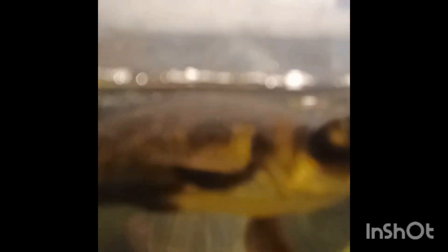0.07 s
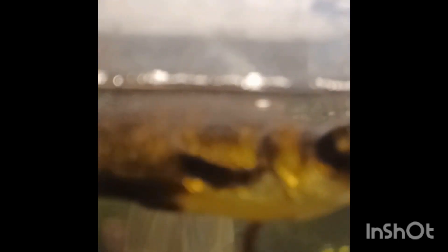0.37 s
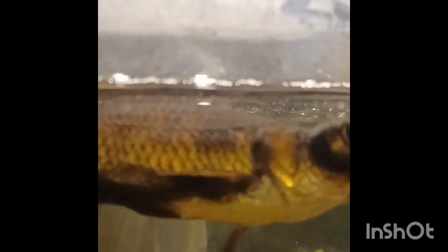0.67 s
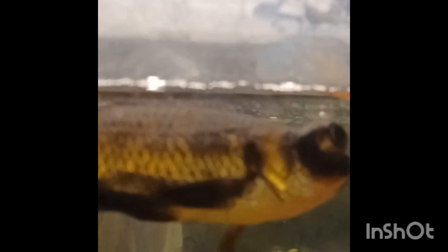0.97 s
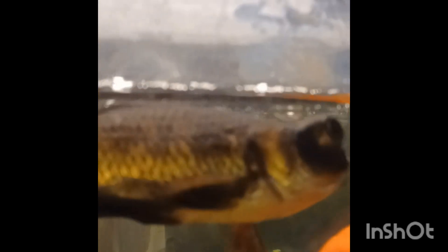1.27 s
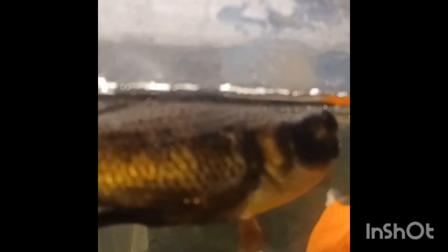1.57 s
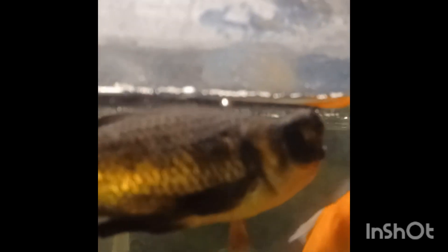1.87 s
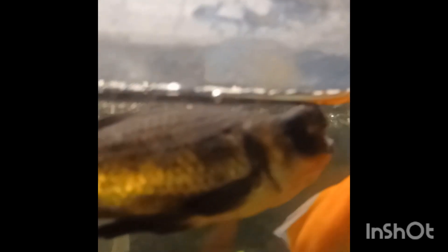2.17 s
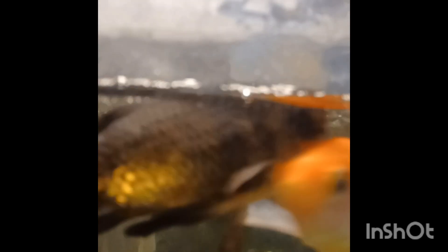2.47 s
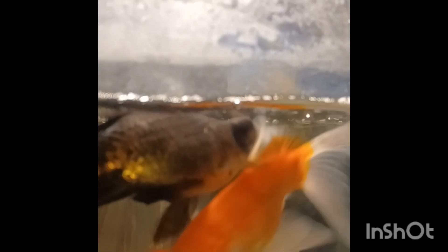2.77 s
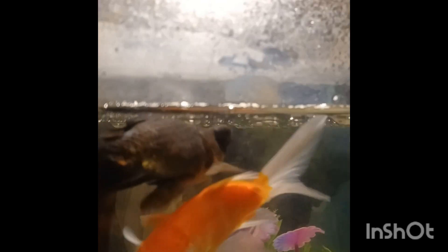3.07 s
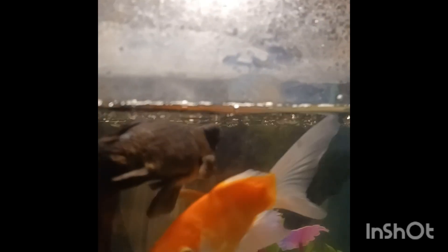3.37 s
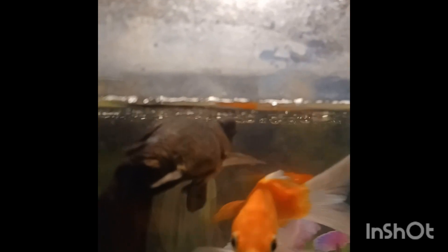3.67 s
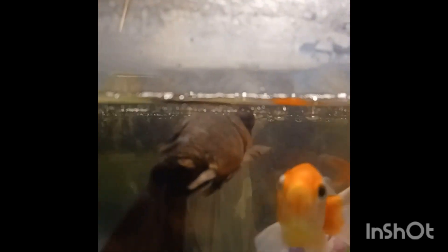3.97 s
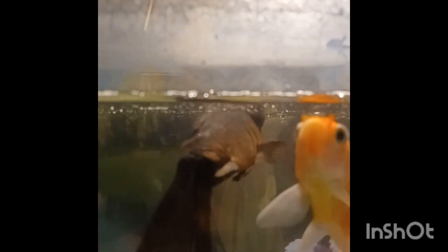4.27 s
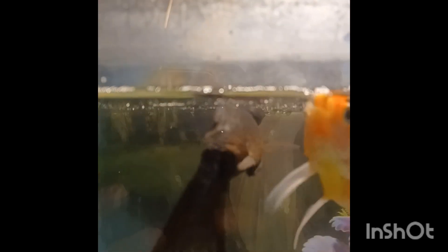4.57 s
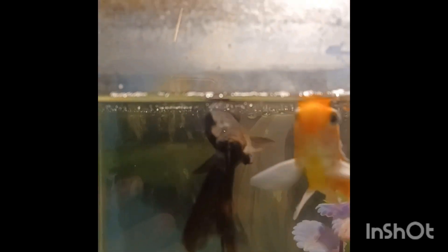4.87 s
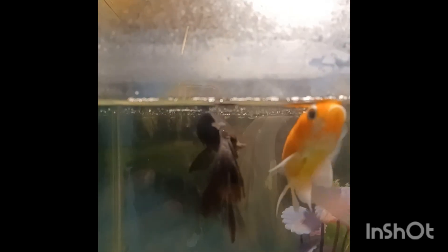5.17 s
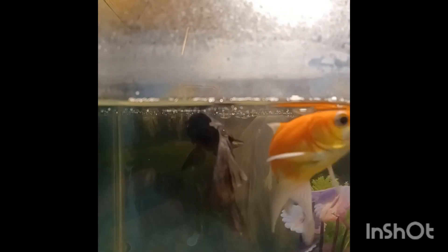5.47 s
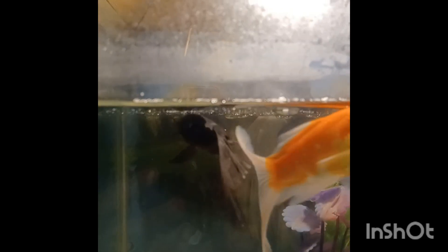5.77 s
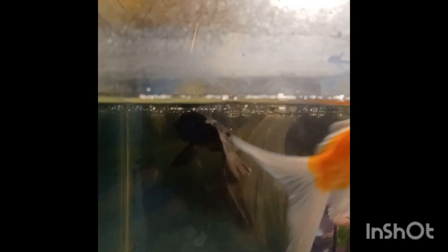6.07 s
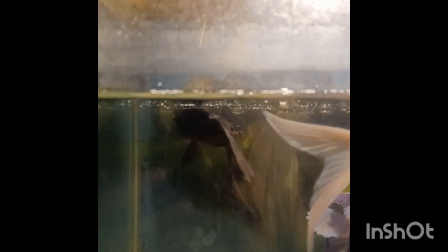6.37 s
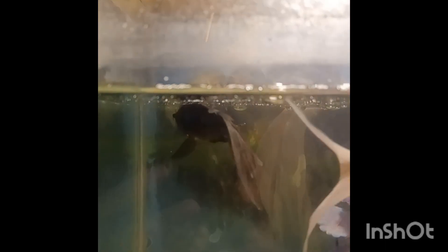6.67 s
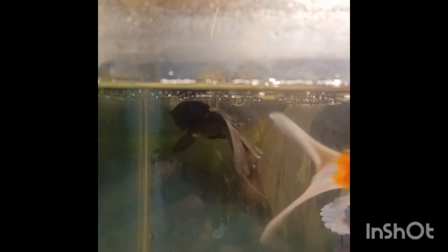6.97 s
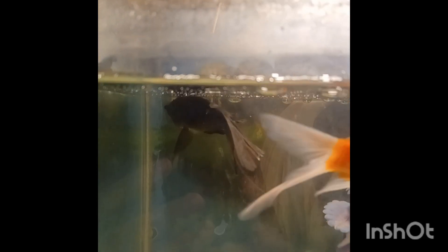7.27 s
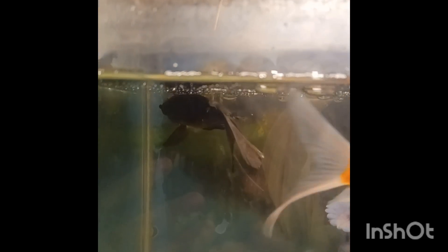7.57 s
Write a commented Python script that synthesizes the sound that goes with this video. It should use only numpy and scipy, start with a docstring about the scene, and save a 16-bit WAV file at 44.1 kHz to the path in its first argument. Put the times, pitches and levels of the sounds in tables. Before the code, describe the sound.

From start to end, about seven and a half seconds, an aquarium air pump hums steadily at close range, with a thin buzz and a faint hiss of air. Bubbles gurgle continuously through the water of the small tank and burst in a fine, high fizz at the surface, a little to the right. Tiny bright droplet ticks are scattered throughout, thickest between 1.5 and 3 seconds. At about 2.1 seconds one short splash ends in a plop. A soft, dull bump comes near 4.9 seconds, with much fainter ones around 2.5 and 7.4. Slightly larger gulps of air rise near 1.4, 4.6, 5.5 and 6.4 seconds, and the water splutters lightly around 5.7. Behind it all lie a low indoor rumble and the drone of a slow fan. The overall sound is quiet and even.

```python
"""Small fish tank, close up

A mains-driven diaphragm air pump knocks once a cycle: a steady hum with a thin buzz and a hiss of air.
The air gurgles up through the water and fizzes at the surface; droplets tick, the water splutters,
and one short splash ends in a plop. Behind it sit a low room rumble, a slow fan and a few soft bumps."""
import sys
import numpy as np
from scipy import signal
from scipy.fft import rfft, irfft, next_fast_len
from scipy.io import wavfile
from scipy.ndimage import map_coordinates

SR = 44100
rng = np.random.default_rng(int(sys.argv[2]) if len(sys.argv) > 2 else 0)


def dump_mix(stems):
    """Bounce the given channels to the path in sys.argv[1] as a 16-bit WAV at rate SR."""
    frames = np.atleast_2d(stems).T  # one column per channel
    limited = np.clip(frames, -1, 1)  # hard clip at full scale
    pcm = np.round(limited * 32767).astype(np.int16)
    wavfile.write(sys.argv[1], SR, pcm)


N = 340804
MAINS_HZ, FIRST_STROKE_S = 50.222, .0205

# The pump's hum. Each row: multiple of the mains frequency, left and right level in dB.
PUMP_HUM = [(1, -74.5, -73.0), (2, -54.5, -59.0), (3, -46.5, -46.0), (4, -47.5, -47.5), (5, -45.0, -46.0),
            (6, -38.0, -38.5), (7, -45.0, -56.0), (8, -42.0, -44.0), (9, -59.5, -51.0), (10, -78.5, -61.0),
            (11, -57.5, -52.5), (12, -50.0, -47.5), (13, -53.5, -55.5)]
# The buzz of its case and valves. Each row: frequency in Hz, left and right base level in dB.
PUMP_BUZZ = [(753, -65.0, -60.0), (954, -64.5, -62.0), (1055, -74.5, -68.0), (1155, -75.0, -60.0),
             (1356, -80.5, -69.0), (1507, -83.5, -82.5), (1657, -84.0, -72.5), (1808, -82.0, -76.0),
             (2009, -73.5, -73.0), (2260, -76.0, -72.5), (2360, -71.5, -63.5), (2511, -80.5, -70.0),
             (2712, -96.0, -97.5), (3415, -91.5, -97.5)]
# Fader moves on the two buzzing resonances. Each row: time in seconds, case and valve gain in dB.
BUZZ_FADERS = [(0, -0.5, 3.5), (1.5, -2, 3.5), (2.1, -1.5, 2.5), (2.4, -4, 0.5), (4.3, -4, -0.3),
               (5.7, -2.5, -0.5), (6.4, -1, -0.2), (7.5, 1, -1)]
# The hiss of pumped air. Each row: frequency in Hz, left and right base level in dB per Hz.
HISS_SPECTRUM = [(895, -120, -115), (1370, -99.5, -91.5), (1540, -99, -89.5), (1850, -92.5, -91),
                 (2490, -99, -94), (2670, -105, -106), (3600, -109, -107), (3770, -114, -111),
                 (4410, -114, -111), (5730, -125, -128)]
# Bubbles, coloured by the air under the lid. Each row: frequency in Hz, left and right base dB per Hz.
GURGLE_SPECTRUM = [(352.05, -105, -105), (476, -92, -92.5), (564, -94.5, -77.5), (691, -84, -80),
                   (723.3, -67.5, -65), (816, -71.5, -67), (869, -82, -72), (1003, -78, -71.5),
                   (1033, -93.5, -79.5), (1307, -85, -79), (1560, -100, -93), (2300, -120, -118)]
# Larger gulps of air. Each row: time in seconds, boost in dB.
AIR_GULPS = [(.85, 3), (1.35, 4), (4.58, 4), (5.49, 6), (6.42, 4.5), (7.02, 2.5)]
# Tiny bubbles bursting. Each row: frequency in Hz, left and right base level in dB per Hz.
FIZZ_SPECTRUM = [(3000, -125, -125), (6000, -112, -119), (6400, -107.5, -111), (8400, -114.5, -105.3),
                 (9500, -115.5, -106), (10360, -118.5, -102), (12300, -116.5, -101.5),
                 (14000, -114.5, -107), (15600, -113.5, -108.5)]
# Droplet ticks. Each row: start in seconds, relative level in dB, pitch in Hz, left over right in dB.
DROPLETS = [(0.431, -45.5, 11000, -18), (0.7802, -48, 12100, -16), (0.858, -45, 11800, -22),
            (1.4891, -45, 11600, -14), (1.7585, -52.5, 11900, -13), (1.8233, -52.5, 11500, -13),
            (1.8517, -63, 5500, 2), (2.0456, -49, 11800, -13), (2.0708, -45.5, 11100, -26),
            (2.214, -46, 8000, -18), (2.2284, -46, 12700, -13), (2.2628, -47.5, 13300, -10),
            (2.5098, -53, 7768, -17), (2.5307, -47, 11260, -12.5), (2.5651, -50, 9856, -14),
            (2.7208, -45, 12600, -21), (2.762, -50, 10600, -18), (3.4126, -48.5, 10100, -15),
            (3.6172, -51.5, 11900, -11), (3.719, -55, 6750, -4), (3.7994, -52, 10900, -17),
            (4.295, -60, 6800, 0), (4.9696, -50.5, 14900, -6), (5.149, -58, 6200, 0), (6.07, -59, 5900, -1),
            (6.478, -56.5, 6700, -1.5), (7.002, -52.5, 9860, -6), (7.363, -54, 13700, -15.5),
            (7.4286, -52, 11400, -9)]
# Splashes and splutters. Each row: start and length in seconds, level in dB, growth over the length
# in dB, left over right in dB, treble tilt in dB per octave.
SPURTS = [(.45, .02, -66, 0, 0, -1), (1.02, .015, -66.5, 0, 1, -3), (1.345, .008, -63, -3, -3, -3),
          (2.046, .002, -54, 0, 0, -2), (2.103, .048, -48, 6, -1, 3.5), (2.128, .012, -44, 3, 7, -5),
          (2.139, .012, -36.5, 0, 13, -4.5), (2.155, .09, -60, -5, 0, -5), (2.212, .007, -50, 2, -5, -5),
          (4.65, .06, -67, 0, 0, -10), (4.92, .02, -58, -4, 0, -11), (5.17, .05, -68, 0, 1, -3),
          (5.712, .006, -59, 0, 2, -4), (5.733, .004, -54, 0, 2, -4), (5.775, .025, -60, -2, 1, -4),
          (6.324, .025, -68, -2, 2, -2)]
# The tone of their spray. Each row: frequency in Hz, relative level in dB.
SPRAY_SPECTRUM = [(300, -31), (900, 13), (1800, -8.5), (3500, -1.5), (5500, -6.5), (9000, -9.5),
                  (13500, -5.5), (16000, -5.5)]
# Room rumble. Each row: frequency in Hz, left and right level in dB per Hz.
RUMBLE_SPECTRUM = [(20, -102, -102), (42, -95.5, -102), (57.6, -91.5, -99.5), (79, -79.5, -76.5),
                   (118, -76.5, -78.5), (162, -73, -75), (217.87, -81.5, -74.5), (292, -86, -71.5),
                   (406, -80, -82), (520, -103, -102.5), (895, -115, -115)]
# Overtones of the fan's blade rate. Each row: frequency in Hz, level in dB.
FAN_TONES = [(71.1, -69), (94.8, -66), (106.6, -61.5), (118.5, -55.5), (142.2, -61), (165.9, -64),
             (177.7, -58), (189.6, -76), (213.3, -63.5)]
# Soft bumps. Each row: start in seconds, relative level in dB, time to fall 60 dB in seconds.
SOFT_BUMPS = [(2.549, -43, 0.16), (4.914, -26, 0.13), (5.019, -45, 0.29), (7.361, -46, 0.24)]
# The tone of a bump. Each row: frequency in Hz, relative level in dB.
BUMP_SPECTRUM = [(30, -29), (90, 2), (200, -17), (300, 13), (420, -23), (1500, -17), (4000, -67)]


def amp(db):
    """Decibels to gain."""
    return 10 ** (np.asarray(db) / 20)


def unit(x):
    """Scale to rms 1."""
    return x / np.sqrt(np.mean(x ** 2) + 1e-20)


def bell(x, width):
    """A bell curve of height 1 around zero."""
    return np.exp(-.5 * (x / width) ** 2)


def along(points, hz):
    """Read each level column of a spectrum on a log frequency axis."""
    f, *cols = np.transpose(points)
    return np.array([np.interp(np.log(hz + 1), np.log(f + 1), c) for c in cols])


def wobble(rate, size=N):
    """A smooth random curve, rate knots a second."""
    knots = rng.standard_normal(int(size * rate / SR) + 4)
    fine = np.arange(8 * len(knots)) / 8
    return np.interp(np.arange(size) * rate / SR, fine, map_coordinates(knots, [fine], mode='nearest'))


def filtered(x, response):
    """EQ x with a function of frequency."""
    m = next_fast_len(x.shape[-1] + 8192)
    return irfft(rfft(x, m) * response(np.fft.rfftfreq(m, 1 / SR)), m)[..., :x.shape[-1]]


def coloured(white, spectrum):
    """Give white noise of rms 1 a spectrum in dB per Hz, rolling off above its last point."""
    cutoff_hz = 1.5 * spectrum[-1][0]
    response = lambda hz: amp(along(spectrum, hz)) * np.sqrt(SR / 2) / (1 + (hz / cutoff_hz) ** 8)
    return filtered(white, response)


def shaped_noise(colour, size, channels=2):
    """Noise through an EQ curve, at rms 1."""
    return unit(filtered(rng.standard_normal((channels, size)), colour))


def stereo_noise(shared):
    """White noise with a share of its power common to both sides."""
    return np.sqrt(shared) * rng.standard_normal(N) + np.sqrt(1 - shared) * rng.standard_normal((2, N))


def panned(db):
    """Left and right gains for a level difference."""
    gains = amp([[db / 2], [-db / 2]])
    return gains / np.sqrt(np.mean(gains ** 2))


def add(out, s, sound):
    """Mix a sound in at s seconds."""
    part = out[:, round(s * SR):][:, :sound.shape[-1]]
    part += sound[..., :part.shape[-1]]


def slow_fade(start_db, fall_db_per_s, wander_db, rate):
    """Left and right gain in dB: a steady slide with a shared random wander."""
    slide = np.array(start_db)[:, None] - np.outer(fall_db_per_s, np.arange(N) / SR)
    return slide + wander_db * wobble(rate)


def stroke_phase():
    """Pump cycles since the first stroke."""
    return (np.arange(N) / SR - FIRST_STROKE_S) * MAINS_HZ


def looped(overtones, size=4096):
    """Loop one pump cycle built from complex rms overtones, order 0 upward."""
    cycle = irfft(overtones, size) * size / np.sqrt(2)
    return np.array([np.interp(stroke_phase() % 1, np.arange(size) / size, c, period=1) for c in cycle])


def pump(buzz_db=1, left_lag_s=.00021, flutter_db=.63, overtones=70):
    """Each stroke is one short push on the case, the hum, with a burst of rattle around it, the buzz."""
    order = np.arange(overtones)
    hz = order * MAINS_HZ
    in_hum = order <= len(PUMP_HUM)
    multiples, *sides = np.transpose(PUMP_HUM)
    hum_db = np.array([np.interp(order, np.r_[0, multiples], np.r_[-120, db]) for db in sides])
    # past its antiresonance near 500 Hz the case swings the other way
    turn = np.interp(hz, [400, 550], [-.3, 3])
    # the shorter waves reach the left microphone later
    lag = 2 * np.pi * hz * np.array([[left_lag_s], [0]]) * (hz > 380)
    push = -amp(hum_db) * in_hum * np.exp(1j * (turn - lag))
    # the rattle is the same at every stroke; its echoes fill the cycle, the low ones most
    t = np.fft.fftfreq(2 * overtones - 2, MAINS_HZ)
    burst = rfft(rng.standard_normal(len(t)) * bell(t, .002))
    echoes = rfft(rng.standard_normal((2, len(t)))) * .32 / (1 + (hz / 1500) ** 8)
    rattle = amp(along(PUMP_BUZZ, hz) + buzz_db) * ~in_hum * np.exp(1j * np.angle(burst + echoes))
    delayed = rattle * np.exp(-1j * lag)
    # the case rings near 2 kHz, in step on both sides; the valves ring just above
    case_band = (hz > 1850) & (hz <= 2200)
    valve_band = (hz > 2200) * amp(np.interp(hz, [2600, 3000], [1, -5]))
    times, *faders = np.transpose(BUZZ_FADERS)
    case_db, valve_db = [np.interp(np.arange(N) / SR, times, db) for db in faders]
    body = looped(delayed * (hz <= 1850))
    case = looped(rattle * case_band) * amp(case_db)
    valves = looped(delayed * valve_band) * amp(valve_db)
    hum = looped(push) * amp(.12 * wobble(7.7))
    return hum + (body + case + valves) * amp(flutter_db * wobble(35))


def air_hiss(top_db, puff=.16, width_cycles=.54, sputter_db=1):
    """Air hisses a touch harder while the diaphragm pushes, and sputters a little."""
    from_stroke = (stroke_phase() + .5) % 1 - .5
    pulse = np.sqrt(1 + puff * bell(from_stroke, width_cycles))
    envelope = unit(pulse * amp(sputter_db * wobble(14)))
    hiss = coloured(stereo_noise(shared=.16) * envelope, HISS_SPECTRUM)
    # only the fine top of the hiss slides and wanders in level
    top = filtered(hiss, lambda hz: hz > 2700)
    return hiss - top + top * amp(top_db)


def gurgle(per_s=320, ring_cycles=7, rise=.08, wash=1.32, length_s=.029):
    """Bubbles leave the air stone, each a short rising ring, on a wash of stirred water."""
    out, t = np.zeros((2, N)), np.arange(int(length_s * SR)) / SR
    lowest_hz, span_hz = 500, 1100
    for when, pitch, _, side in rng.random((int(per_s * N / SR), 4)):
        hz = lowest_hz + span_hz * pitch
        chirp = np.sin(2 * np.pi * hz * t * (1 + rise * t / length_s))
        envelope = np.exp(-2 * t * hz / ring_cycles) * (1 - np.exp(-t * hz))
        add(out, when * (N - 1) / SR, panned(4 * (side - .5)) * np.sqrt(hz) * chirp * envelope)
    # the rings fill a narrow band: trim them to the wash's level per Hz
    rings = unit(out) * np.sqrt(span_hz / (SR / 2))
    water = coloured((rings + wash * stereo_noise(shared=.99)) / np.hypot(1, wash), GURGLE_SPECTRUM)
    # above its first cross mode the air space swings in opposite senses at the two microphones
    turn = lambda hz: np.interp(hz, [900, 1020], [0, 2.4])
    return filtered(water, lambda hz: np.exp(-1j * turn(hz) * np.array([[1], [0]])))


def air_stone_vigour(trim_db=-.6, churn_db=.1, gulp_width_s=.016):
    """The stone bubbles unevenly: a gain in dB with slight churning and the odd larger gulp."""
    t = np.arange(N) / SR
    gulps = sum(db * bell(t - s, gulp_width_s) for s, db in AIR_GULPS)
    return trim_db + churn_db * wobble(14) + gulps


def fizz(gain_db, per_s=190, spread_db=3.5, t60=.061, bed=.85):
    """Tiny bubbles burst at random; each rings briefly between the water and the lid."""
    onsets = rng.random(N) < per_s / SR
    bursts = onsets * amp(spread_db * np.clip(rng.standard_normal(N), -2, 2)) ** 2
    t = np.arange(SR // 10) / SR
    power = np.abs(signal.fftconvolve(bursts, amp(-60 * t / t60) ** 2)[:N])
    envelope = unit(np.sqrt(power / power.mean() + bed))
    return coloured(stereo_noise(shared=.017) * envelope, FIZZ_SPECTRUM) * amp(gain_db)


def pings(per_s=26, base_db=-74.5, t60=.055, width_octaves=.045):
    """Middling bubbles burst one by one, each with a faint pitch of its own."""
    out, t = np.zeros((2, N)), np.arange(SR // 12) / SR
    for when, pitch, size in rng.random((int(per_s * N / SR), 3)):
        centre_hz = 5900 * 2 ** (pitch ** 1.5)
        ring = shaped_noise(lambda hz: bell(np.log2((hz + 1) / centre_hz), width_octaves), len(t))
        # the lid colours them like the fizz
        lid_db = .71 * (along(FIZZ_SPECTRUM, centre_hz)[:, None] + 108)
        size_db = -4 * np.log(size + .063)
        add(out, when * (N - 1) / SR, amp(base_db + lid_db + size_db - 60 * t / t60) * ring)
    return out


def droplets(t60=.079, width_octaves=.19, skirt_db=-16, trim_db=-9):
    """Droplets and larger bursts: a bright tick around one pitch, prolonged by the glass."""
    out, t = np.zeros((2, N)), np.arange(SR // 10) / SR
    for s, db, centre_hz, pan_db in DROPLETS:
        peak = lambda hz: bell(np.log2((hz + 1) / centre_hz), width_octaves)
        tick = shaped_noise(lambda hz: peak(hz) + amp(skirt_db) * (hz > 2000), len(t))
        add(out, s, amp(db + trim_db - 60 * t / t60) * panned(pan_db) * tick)
    return out


def splashes(t60=.028, grain_db=4.5):
    """Water spurts in short bursts of grainy spray, each with a quick tail."""
    out, t = np.zeros((2, N)), np.arange(SR // 5) / SR
    treble_octaves = lambda hz: np.log2(np.maximum(hz, 2000) / 2000)
    for s, length, db, growth_db, pan_db, tilt_db in SPURTS:
        colour = lambda hz: amp(along(SPRAY_SPECTRUM, hz) + tilt_db * treble_octaves(hz))
        spray = shaped_noise(colour, len(t))
        ramp_db = growth_db * (np.minimum(t / length, 1) - .5)
        tail_db = -60 * np.maximum(t - length, 0) / t60
        envelope = amp(db + ramp_db + tail_db + grain_db * wobble(700, size=len(t)))
        add(out, s, envelope * panned(pan_db) * spray)
    return out


def plop(start_s=2.15, hz=700, t60=.005, attack_s=.0005, left_db=-10, right_db=-21):
    """The cavity left by the splash closes with one very short ring."""
    out, t = np.zeros((2, N)), np.arange(SR // 5) / SR
    envelope = amp(-60 * t / t60) * (1 - np.exp(-t / attack_s))
    add(out, start_s, amp([[left_db], [right_db]]) * envelope * np.sin(2 * np.pi * hz * t))
    return out


def fan(waver_db=2.5, drift_rad=.53):
    """A slow fan drones on overtones of its blade rate, each wavering in level and phase."""
    drone, t = np.zeros(N), np.arange(N) / SR
    for hz, db in FAN_TONES:
        level = amp(db + waver_db * wobble(2.03)) * np.sqrt(2)
        phase = 2 * np.pi * (hz * t + rng.random()) + drift_rad * wobble(1.96)
        drone += level * np.sin(phase)
    return drone


def room_tone(swell_db=.7):
    """The fan and a low rumble, swelling together at random."""
    bed = fan() + coloured(stereo_noise(shared=.81), RUMBLE_SPECTRUM)
    return bed * amp(swell_db * wobble(9))


def bumps(attack_s=.013):
    """Dull thuds with a soft attack, dead centre."""
    out, t = np.zeros((2, N)), np.arange(SR // 2) / SR
    for s, db, t60 in SOFT_BUMPS:
        thud = shaped_noise(lambda hz: amp(along(BUMP_SPECTRUM, hz)), len(t), channels=1)
        add(out, s, amp(db - 60 * t / t60) * (1 - np.exp(-t / attack_s)) * thud)
    return out


def scene():
    """Mix pump, water and room."""
    # the top of the hiss and the fizz ease off on the right and drift towards the centre
    hiss_db = slow_fade(start_db=(-.6, 3), fall_db_per_s=(0, .63), wander_db=1.3, rate=6)
    fizz_db = slow_fade(start_db=(-3.3, 0), fall_db_per_s=(-.5, .11), wander_db=.5, rate=5)
    bubbles = gurgle() * amp(air_stone_vigour())
    surface = fizz(fizz_db) + pings() + droplets() + splashes() + plop()
    return pump() + air_hiss(hiss_db) + bubbles + surface + room_tone() + bumps()


def record(dry):
    """A quick fade at each end; the microphone keeps nothing above its band limit."""
    fade_s, top_hz = .003, 15850
    n = np.arange(N)
    fade = np.clip(np.minimum(n, N - 1 - n) / (fade_s * SR), 0, 1)
    return filtered(dry * fade, lambda hz: hz < top_hz)


dry = scene()
out = record(dry)
dump_mix(out)
```